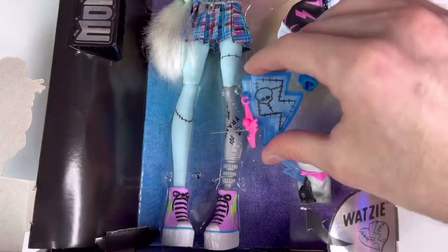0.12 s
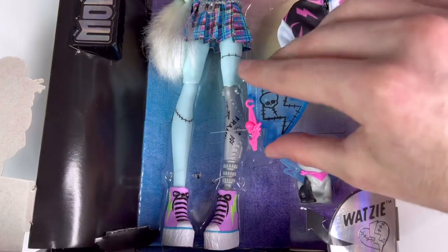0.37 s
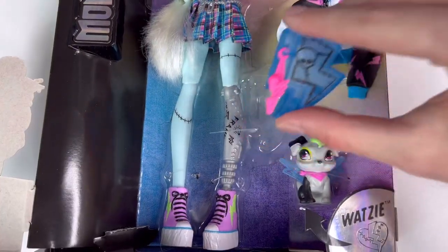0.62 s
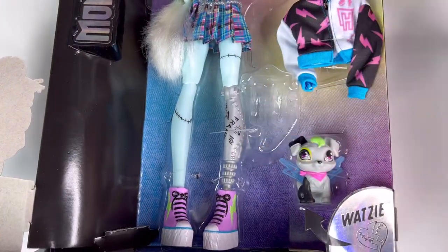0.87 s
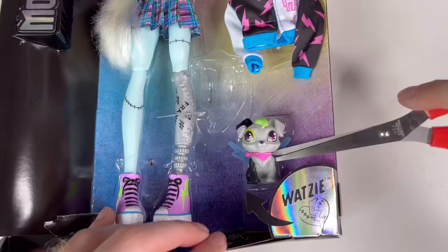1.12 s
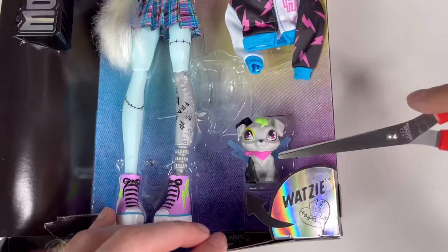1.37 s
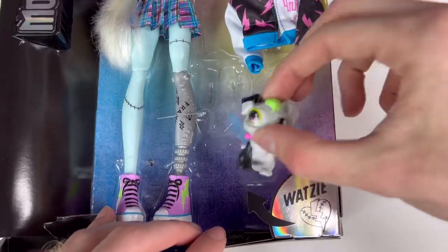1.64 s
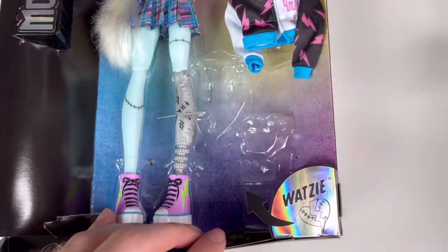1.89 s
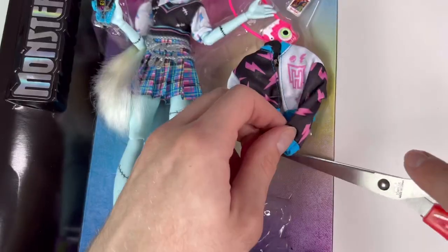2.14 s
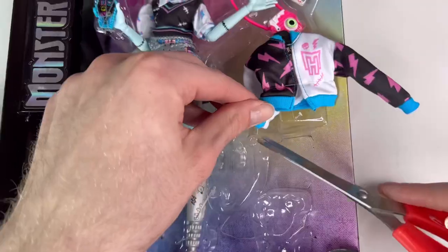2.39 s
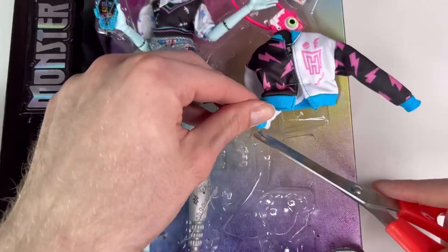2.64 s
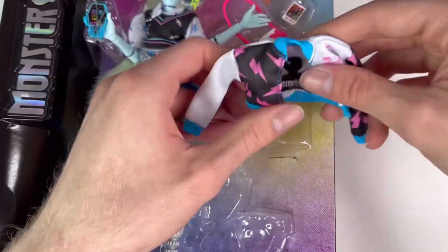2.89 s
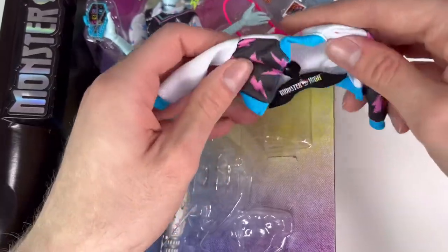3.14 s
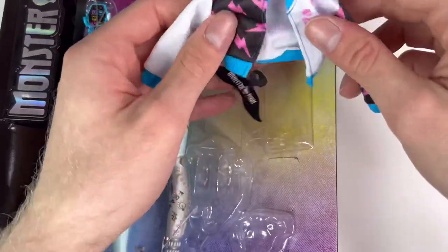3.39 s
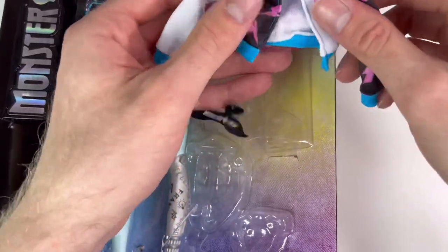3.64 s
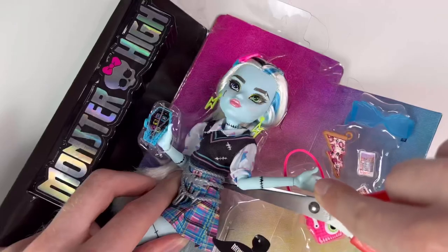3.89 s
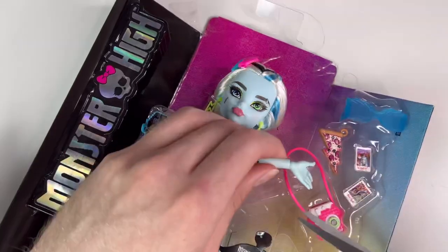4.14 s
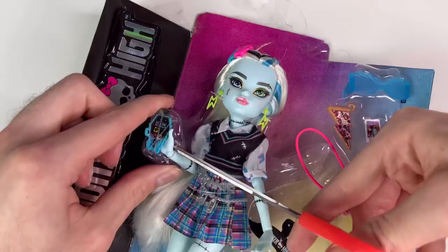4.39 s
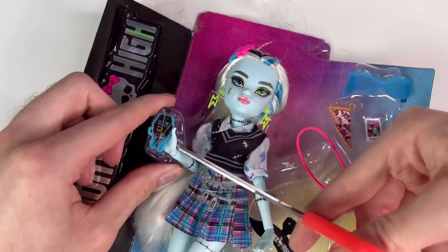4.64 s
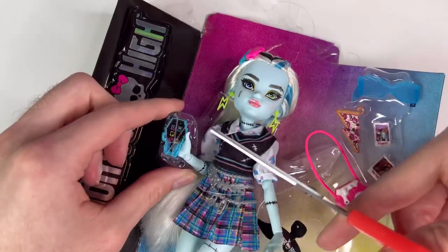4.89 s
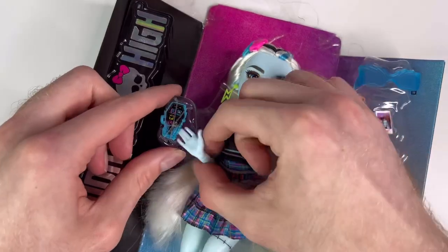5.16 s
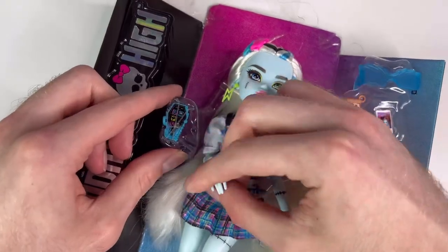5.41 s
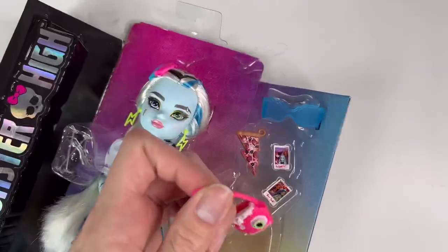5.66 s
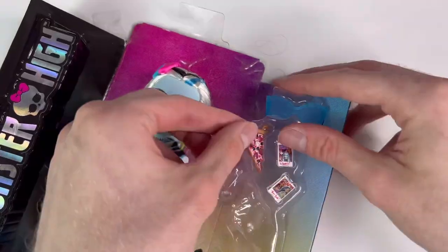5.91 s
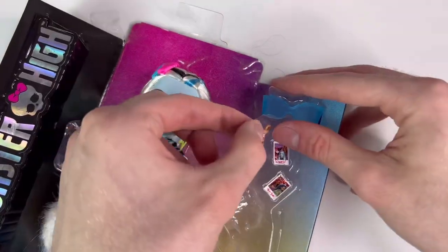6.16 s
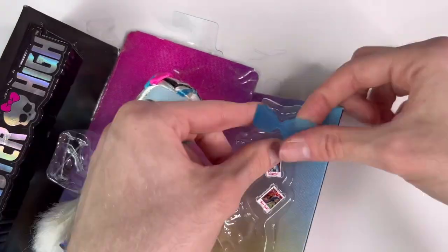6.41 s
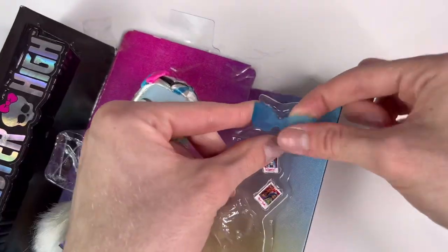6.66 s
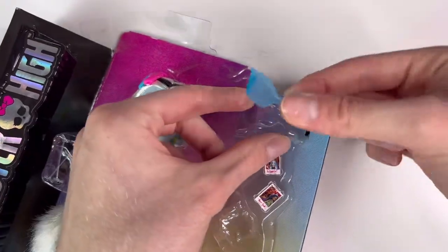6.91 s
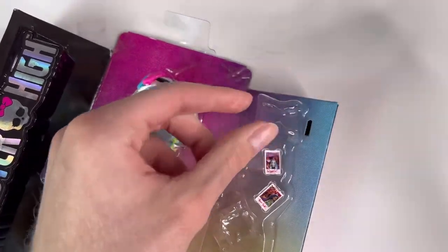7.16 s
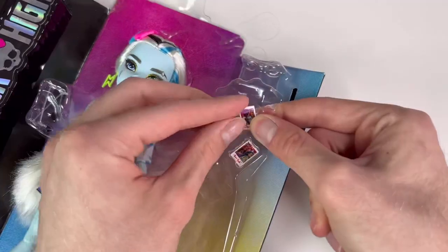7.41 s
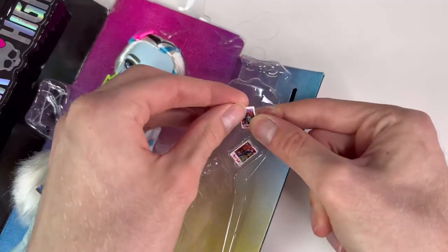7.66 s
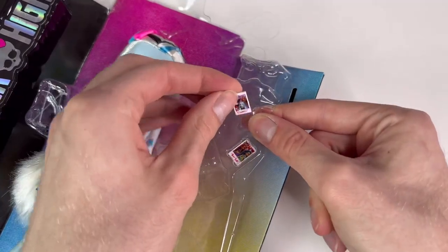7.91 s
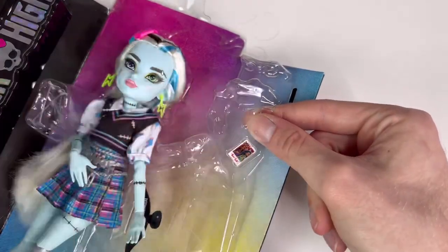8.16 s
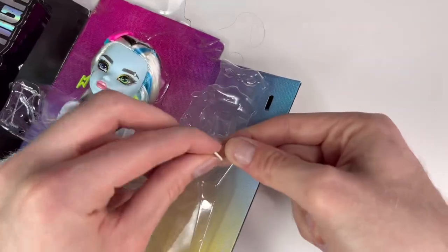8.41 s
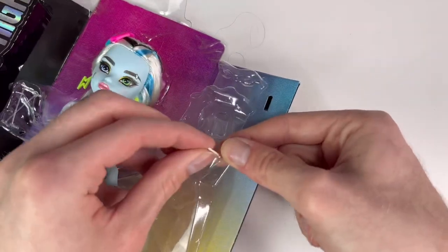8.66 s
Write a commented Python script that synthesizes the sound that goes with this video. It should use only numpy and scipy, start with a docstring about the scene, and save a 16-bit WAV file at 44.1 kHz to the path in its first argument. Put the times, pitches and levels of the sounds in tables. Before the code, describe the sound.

A close, dry recording of a toy package being opened on a table in a quiet room with very faint hum, the left side louder. Light finger rustle and tiny ticks fill the first second. At 1.2 s a loud, crisp snip cracks with a dull box thud; a smaller pop follows at about 1.55. A still harder snip lands at 2.07 with short rattling after-clicks, then soft rubbing and minor ticks at 2.3-3.3. The background dips almost to silence around 3.4-3.65. Sharp snips return at 3.9, 4.2 and 4.5, with low knocks. Crinkling grows busier from 5.1, bursting into bright, close-packed cracks at 5.5-5.7 and a duller snap at 6.0. Rubbing leads to a strong plastic pop and the heaviest thud at 6.7, a brief rustle at 6.9, then quiet fingering, with small ticks and creaks to the end, around 8.8.

```python
"""Fingers rustle on a toy package in a quiet room with a faint hum; then scissors snip the ties and the stiff
plastic pops and crackles, while card and table thud. Two microphone ports sit close by, the left one louder.
Rustle and snaps are stick-slip clicks, noise and blows ringing card modes and plastic colour filters;
thuds are soft pushes on low modes. Room tone is shaped noise, the hum a sine, the echoes sparse taps."""
import sys
import numpy as np
from scipy import signal
from scipy.fft import rfft, irfft, next_fast_len
from scipy.io import wavfile
from scipy.ndimage import uniform_filter1d

SR = 44100
rng = np.random.default_rng(int(sys.argv[2]) if len(sys.argv) > 2 else 0)


def gain_from_decibels(decibels):
    """Convert decibel values to linear amplitude factors."""
    exponent = np.asarray(decibels, float) / 20
    return 10 ** exponent


def wav_record(signal):
    """Record a signal, one row per channel, as 16-bit PCM in the file named by sys.argv[1]."""
    frames = np.transpose(np.atleast_2d(signal))
    bounded = np.clip(frames, -1, 1)
    # unit amplitude maps onto the largest positive 16-bit level
    quanta = np.round(bounded * 32767).astype(np.int16)
    wavfile.write(sys.argv[1], SR, quanta)


N = 387638  # length in samples


def evened(x):
    """Scales to rms 1."""
    return x / np.sqrt(np.mean(x ** 2) + 1e-20)


def read(points, hz):
    """Reads a table on a log-frequency axis."""
    f, value = np.transpose(points)
    return np.interp(np.log(hz + 1), np.log(f + 1), value)


def add(mix, s, sound):
    """Mixes a sound in at s seconds."""
    part = mix[round(s * SR):][:len(sound)]
    part += sound[:len(part)]


def ring(x, hz, width):
    """One damped mode driven by x, gain 1 at its centre; a wider mode dies sooner."""
    r = np.exp(-np.pi * max(width, 5) / SR)
    return 2 * signal.lfilter([1 - r], [1, -r * np.exp(2j * np.pi * hz / SR)], x).real


def causal(points):
    """Minimum-phase impulse with the given spectrum."""
    level_db = np.maximum(read(points, abs(np.fft.fftfreq(4096, 1 / SR))), -100)
    log_gain = np.log(gain_from_decibels(level_db))
    return np.fft.ifft(np.exp(signal.hilbert(log_gain).conj())).real[:1024]


def slips(size, per_s, spread_db):
    """Sparse stick-slip clicks of random sign, a few of them large."""
    hit = rng.random(size) < per_s / SR
    sign = rng.choice([-1., 1.], size)
    big = rng.exponential(1, size)
    return hit * sign * gain_from_decibels(spread_db * np.minimum(big, 4))


# spectrum of the room tone: f/Hz, relative level/dB
AIR_COLOUR = [(30, -17), (59, -6), (85, -23), (123, -21.5), (280, -32), (3000, -51.5), (16000, -66.5)]
# likeness of the room tone on the two ports: f/Hz, correlation/0-1
AIR_SAME = [(60, 0.23), (2000, 0.078)]
# level curve of the room tone, with a brief dip: t/s, level/dB
AIR_LULL = [(3.3, 1), (3.4, -42), (3.66, -27), (3.69, 3)]
# mains hum: f/Hz, rms level/dB ahead of the left-right lean
HUM = [(120, -75.5)]
AIR_DB = -64  # rms of the room tone ahead of the level curve and the left-right lean


def air():
    """Noise tone drifting in level and colour, mostly unlike on the two ports, and a steady mains hum."""
    t = np.arange(N) / SR
    frames, hz = N // 512 + 5, np.fft.rfftfreq(2048, 1 / SR)
    a, b, c, d, patches = rng.standard_normal((frames, 1025, 5)).T
    drift = evened(uniform_filter1d(uniform_filter1d(patches, 8, 0), 8, 1))
    same = np.clip(read(AIR_SAME, hz), -1, 1)[:, None]
    left = a + 1j * b
    right = same * left + np.sqrt(1 - same ** 2) * (c + 1j * d)
    z = np.array([left, right]) * gain_from_decibels(read(AIR_COLOUR, hz)[:, None] + 2 * drift)
    tone = gain_from_decibels(AIR_DB) * evened(signal.istft(z, nperseg=2048, noverlap=1536)[1][:, :N])
    tone *= gain_from_decibels(np.interp(t, *np.transpose(AIR_LULL)))
    return tone + sum(np.sqrt(2) * gain_from_decibels(db) * np.sin(2 * np.pi * f * t) for f, db in HUM)


# decay of the echoes: f/Hz, t60/s
ROOM_T60 = [(200, 0.45), (1000, 0.1), (5000, 0.28), (12000, 0.016)]


def room(x):
    """Sparse echoes of random sign, each band dying at its own speed, other echoes on each port."""
    taps = np.zeros((2, SR // 2))
    at = np.arange(200, SR // 2 - 20, 20) + rng.integers(0, 20, (2, (SR // 2 - 201) // 20))
    np.put_along_axis(taps, at, rng.choice([-1., 1.], at.shape), 1)
    hz, t, z = signal.stft(taps, SR, nperseg=256)
    fade = gain_from_decibels(-60 * t / read(ROOM_T60, hz)[:, None])
    tail = signal.istft(z * fade, SR, nperseg=256)[1]
    return signal.fftconvolve(x[None], tail / np.linalg.norm(tail[0]), axes=1)[:, :N]


# left port over right: f/Hz, level/dB
LEFT_OVER_RIGHT = [(100, 3.5), (1000, 4.5), (2500, 3), (6000, 8)]
LEFT_LEADS_S = .0001  # mean lead of the left port


def ports(x):
    """The left port is louder and on average earlier; the phase between the ports wanders at random,
    differently across frequency."""
    hz, t, z = signal.stft(x, SR, nperseg=512, noverlap=384)
    slow = uniform_filter1d(rng.standard_normal(z.T.shape), 40, 0)
    wander = evened(uniform_filter1d(slow, 18, 1)).T
    lag = 2 * np.pi * hz[:, None] * LEFT_LEADS_S + 2.15 * np.tanh(hz / 400)[:, None] * wander  # radians
    half = gain_from_decibels(read(LEFT_OVER_RIGHT, hz) / 2)[:, None]
    pair = np.array([z * half, z / half * np.exp(-1j * lag)])
    return signal.istft(pair, SR, nperseg=512, noverlap=384)[1][:, :N]


# low modes of the box on the table: f/Hz, width/Hz, level/dB
BOX_MODES = [(55.5, 11, -5), (83.5, 14, -0.5), (117, 6.5, -12), (226, 46, 1), (326, 24, -0.5)]


def thud(peak_db):
    """The box rocks on the table: a soft push of some milliseconds rings its low modes."""
    push = np.zeros(SR // 4)
    push[:400] = np.hanning(400) * (1 + 3.8 * uniform_filter1d(rng.standard_normal(400), 30))
    drive = np.gradient(push)
    low = sum(gain_from_decibels(db + 2 * rng.standard_normal()) * ring(drive, f, w) / w for f, w, db in BOX_MODES)
    return gain_from_decibels(peak_db) * low / abs(low).max()


# knocks of the box on the table: t/s, peak level/dB
THUDS = [(1.199, -22), (1.285, -48), (2.065, -29.5), (3.722, -44), (3.913, -24.5), (4.203, -36),
         (4.501, -24.5), (5.345, -41.5), (5.681, -23.5), (5.99, -32), (6.699, -13.5)]


def add_thuds(mix):
    """Places every knock of the box on the table."""
    for start_s, peak_db in THUDS:
        add(mix, start_s, thud(peak_db))


# finger strokes: start t/s, length t/s, level/dB, change by the end level/dB, skin over card level/dB
STROKES = [(0, 0.087, -52.5, -17, -10.5), (0.116, 0.064, -51.5, -8.5, -18.5), (0.2, 0.12, -58.5, 1, -16.5),
           (0.381, .11, -52, -5, -17.5), (1.141, 0.22, -53, -18.5, -19), (1.459, 0.099, -51.5, 13, -12.5),
           (1.654, 0.15, -75, -10.5, 7.5), (1.959, 0.35, -53, -2, -21), (2.245, 0.033, -48, 7, -16.5),
           (2.351, 0.47, -60.5, -21.5, -12), (2.804, 0.16, -54.5, 3.5, -15.5), (3.028, 0.2, -63, 1, -10.5),
           (3.27, 0.18, -49, -9, -15), (3.425, 0.034, -48, 4.5, -12), (3.521, 0.19, -56, -14.5, -8),
           (3.953, 0.11, -61.5, 4.5, -26), (4.129, 0.22, -45.5, 0, -15.5), (4.29, 0.091, -55, -5, -20.5),
           (4.424, 0.28, -51.5, -18, -20), (4.657, 0.46, -51, -14, -10), (4.932, 0.11, -47, 2.5, -14),
           (5.099, 0.39, -47.5, 0, -16), (5.539, 0.0047, -37, 2.5, 0.5), (5.54, 0.27, -40.5, -8, -13.5),
           (5.935, 0.27, -43.5, -8, -18), (6.28, 0.12, -48.5, -6, -9), (6.392, 0.028, -37, -2.5, -7.5),
           (6.468, 0.42, -45.5, 1, -16), (6.883, 0.16, -34, -30.5, -21), (7.042, 0.12, -70.5, 18, -2.5),
           (7.299, 0.19, -52.5, -18, -11.5), (7.51, 0.055, -57.5, 6, -12.5), (7.644, 0.24, -50, -1, -12.5),
           (7.935, 0.28, -63.5, 2.5, -27), (8.235, 0.31, -53.5, -1.5, -14), (8.621, 0.12, -52.5, 13.5, -12)]
TOUCH_DB_PER_S, LIFT_DB_PER_S = 1495.5, 312  # how fast a stroke sets in and dies away


def pressure():
    """Each stroke sets in quickly, swells or fades evenly, and dies away; gains for card and skin."""
    start, length, level_db, change_db, skin_db = np.transpose(STROKES)[:, :, None]
    t = np.arange(0, N + 64, 64) / SR
    since = t - start
    db = level_db + change_db * np.clip(since / length, 0, 1)
    db = db + TOUCH_DB_PER_S * np.minimum(since, 0) - LIFT_DB_PER_S * np.maximum(since - length, 0)
    curves = [np.linalg.norm(gain_from_decibels(db + share), axis=0) for share in (0, skin_db)]
    return [np.interp(np.arange(N) / SR, t, curve) for curve in curves]


# colour of the plastic skin: f/Hz, level/dB
SKIN = [(1500, -4.5), (2600, 4), (3600, 5), (4700, 6.5), (6700, 4.5), (8200, -3.5), (9500, -49.5)]
# colour of its finest creases: f/Hz, level/dB
FILM = [(6500, -15.5), (8600, 2.5), (12000, -2), (15500, -11)]


def plastic():
    """Impulses of the plastic: the stiff skin and its finest creases each colour what excites them."""
    return causal(SKIN), causal(FILM)


# modes of card and blister, for rustle and snaps: f/Hz, base width/Hz (each widens it), base level/dB
PACK_MODES = [(606, 260, -12.5), (759.3, 19, 1.5), (907, 53, 3), (1040, 110, 2), (1244, 60, 7.5),
              (1546, 290, 3.5), (1610, 330, 2.5), (2050, 120, 5.5)]


def rustle(skin, film):
    """Clumps of tiny slips and smooth rubbing under the fingers, heard through card and skin."""
    on_card, on_skin = pressure()
    # creases give way suddenly, then settle
    clumps = .7 + evened(signal.lfilter([1], [1, -.997], abs(slips(N, 45, 3.0))))
    drive = clumps * (evened(slips(N, 900, 2.6)) + .8 * rng.standard_normal(N))
    swish = .4 * drive + rng.standard_normal(N)  # on the smooth skin the fingers mostly glide
    rub = uniform_filter1d(uniform_filter1d(drive, 9), 9)  # the card feels only the slower part
    body = 0
    for f, w, db in PACK_MODES:
        wander_db = 5.8 * evened(uniform_filter1d(rng.standard_normal(N), 3000))  # fingers move over the panels
        body = body + gain_from_decibels(db - 8 * np.log2(f / 1000)) * ring(rub * gain_from_decibels(wander_db), f, 1.4 * w)
    low = evened(sum(gain_from_decibels(db) * ring(rub, f, w) for f, w, db in BOX_MODES))
    crisp = evened(signal.oaconvolve(swish, skin + gain_from_decibels(-12.0) * film)[:N])
    return on_card * (evened(body) + gain_from_decibels(-15) * low) + on_skin * crisp


RING_T60, CRACK_T60 = 0.13, 0.088  # s, after-slips on card and on plastic for a break at 0 dB
LASTING = 0.12  # dB of t60 per dB of level: weaker breaks settle sooner
OWN_Q, OWN_DB = 10, 7  # the struck spot rings at its own pitch: sharpness, level before balancing
BLUNT_S = 0.00023  # time constant of a blow with a 0 dB crack; duller blows press longer
FIZZ_DB, FIZZ_PER_CRACK = -7.5, 1.9  # the sharper the break, the more the finest creases fizz


def snap(level_db, crack_db, panel_hz, skin, film):
    """A break followed by after-slips drives the pack modes, the plastic skin and its creases."""
    t = np.arange(SR // 5) / SR
    after = evened(slips(len(t), 2000, 2.8))
    fade_db = -60 * t / gain_from_decibels(LASTING * level_db)
    # the card feels blunter blows than the plastic
    blow = t * np.exp(-t / (BLUNT_S * gain_from_decibels(min(-crack_db, 24)))) * rng.standard_normal(len(t))
    push = 0.14 * after * gain_from_decibels(fade_db / RING_T60) + 2.2 * blow / np.linalg.norm(blow)
    push = uniform_filter1d(push, 9)
    break_noise = rng.standard_normal(len(t)) * 1.8 * np.exp(-t / 0.00082)
    prick = 0.43 * after * gain_from_decibels(fade_db / CRACK_T60) + break_noise
    body = gain_from_decibels(OWN_DB) * panel_hz ** -.5 * ring(prick, panel_hz, panel_hz / OWN_Q)
    for f, w, db in PACK_MODES:
        # each grip damps and bends the pack anew; modes near the struck panel ring most
        grip_db, bend = rng.standard_normal(2) * [3.0, .04]
        near_db = db - 14 * abs(np.log2(f / panel_hz)) + grip_db
        body = body + gain_from_decibels(near_db) * w ** -.5 * ring(push, f * (1 + bend), 2.6 * w)
    skin_part = signal.fftconvolve(prick, skin)[:len(t)]
    film_part = signal.fftconvolve(prick, film)[:len(t)]
    crack, fizz = gain_from_decibels([crack_db, FIZZ_DB + FIZZ_PER_CRACK * crack_db])
    card = np.sqrt(max(1 - crack ** 2 - fizz ** 2, .03))
    parts = (body, card), (skin_part, crack), (film_part, fizz)
    # each part is balanced by the strength of its first 300 samples
    return gain_from_decibels(level_db) * sum(share * x / np.sqrt(10 * np.mean(x[:300] ** 2)) for x, share in parts)


# snips, pops and ticks: t/s, nominal peak level/dB, share of the plastic crack level/dB,
# struck panel or blister bubble f/Hz
SNAPS = [(.094, -38.5, -20, 1160), (0.211, -36, -29, 1300), (0.496, -36, -10, 759),
         (1.174, -27, -10.5, 1110), (1.201, -6, -4.5, 1360), (1.554, -13.5, -14, 1040),
         (1.593, -21, -16, 1110), (1.622, -33.5, -3.5, 708), (2.021, -32.5, -9.5, 2580),
         (2.065, -2, -8.5, 1360), (2.098, -23, 0.5, 727), (2.129, -22.5, -15, 1200),
         (2.175, -31.5, -14.5, 2000), (2.3048, -20.5, -9, 5850), (2.455, -36.5, -16, 2200),
         (2.55, -19, -11, 1120), (2.844, -18.5, -17, 877), (3.014, -36.5, -45, 713), (3.053, -38, -14, 970),
         (3.191, -41, -35, 880), (3.282, -27.5, -18.5, 1030), (3.399, -73, 21.5, 1120),
         (3.522, -58.5, 9, 1500), (3.584, -38, -18, 1120), (3.662, -22.5, -16, 1210),
         (3.686, -37, -7, 2050), (3.722, -39, -42, 390), (3.797, -40.5, -9, 1500), (3.911, -5, -8, 1600),
         (4.107, -31, -6, 1040), (4.139, -46, -2.5, 1490), (4.176, -37.5, -6.5, 1198),
         (4.209, -15, -19, 1200), (4.213, -5, -15, 1400), (4.497, -8, -3.5, 1260), (4.648, -29.5, -2, 2320),
         (4.779, -38.5, -7, 6800), (4.854, -27, -1.5, 740), (5.181, -19.5, -13.5, 1010),
         (5.195, -27, -8.5, 894), (5.238, -25, -3, 1810), (5.346, -27, -19, 1380),
         (5.359, -19.5, -18.5, 1980), (5.435, -22, -15, 1810), (5.53, -18.5, -9.5, 2300),
         (5.544, -4, -9.5, 4620), (5.5487, -12.5, -2, 4620), (5.666, -12.5, 3.5, 5960),
         (5.6717, -7, -5, 2160), (5.676, -4, -9, 956), (5.977, -33, -1, 900), (5.987, -20, -15.5, 845),
         (5.999, -9.5, -19, 820), (6.118, -32, -17, 920), (6.529, -22, -2.5, 8400),
         (6.595, -29.5, -4.5, 735), (6.693, -2.5, -2, 1010), (6.712, -14, -39, 1040),
         (6.897, -18.5, -4, 789), (7.046, -39, -16.5, 1400), (7.307, -42.5, -4.5, 1000),
         (7.561, -25.5, -22, 894), (7.615, -32.5, -26, 840), (7.745, -41.5, -17, 4250),
         (7.776, -30.5, -10, 907), (7.807, -32.5, -3, 710), (7.951, -39, -20.5, 1004),
         (8.294, -24, -8, 6440), (8.336, -44.5, -24, 2400), (8.482, -37, -4, 1140),
         (8.615, -37.5, -5, 1540), (8.682, -27, -5, 870), (8.711, -19.5, -9, 937), (8.78, -18.5, -1.5, 939)]


def add_snaps(mix, skin, film):
    """Places every snip, pop and tick of the ties and the stiff plastic."""
    for start_s, level_db, crack_db, panel_hz in SNAPS:
        add(mix, start_s, snap(level_db, crack_db, panel_hz, skin, film))


ROOM_DB = -21.5  # echoes against the direct sound, ahead of the lean
LEAN_DB = 4  # left over right for the echoes, room tone and hum


def scene():
    """Snaps, thuds and rustle, direct and through the room, over the room tone."""
    skin, film = plastic()
    pack = rustle(skin, film)
    add_thuds(pack)
    add_snaps(pack, skin, film)
    lean = gain_from_decibels([[LEAN_DB / 2], [-LEAN_DB / 2]])
    return ports(pack) + lean * (gain_from_decibels(ROOM_DB) * room(pack) + air())


def band_limit(x):
    """A steep low-pass at the top of the band."""
    return signal.sosfilt(signal.butter(12, 17070, fs=SR, output="sos"), x)


SPLIT_HZ, IN_STEP_HZ, TOP_LEAD_S = 8500, 11950, 1 / 3530  # top band: its edge, where the sides agree, lead


def record(dry):
    """In the top band both channels carry the left port, the right a little earlier; peaks clip."""
    size = next_fast_len(N)
    hz, (left, right) = np.fft.rfftfreq(size, 1 / SR), rfft(dry, size)
    top = np.clip((hz - SPLIT_HZ) / 500 + .5, 0, 1)
    early_left = left * np.exp(2j * np.pi * (hz - IN_STEP_HZ) * TOP_LEAD_S)
    right += top * (early_left - right)
    pass_band = np.clip((15900 - hz) / 400 + .5, .003, 1) * np.clip(hz / 48, 0, 1) ** 5.5
    mix = irfft(pass_band * np.array([left, right]), size)[:, :N]
    return band_limit(np.clip(mix, -1, 1))


dry = scene()
out = record(dry)
wav_record(out)
```